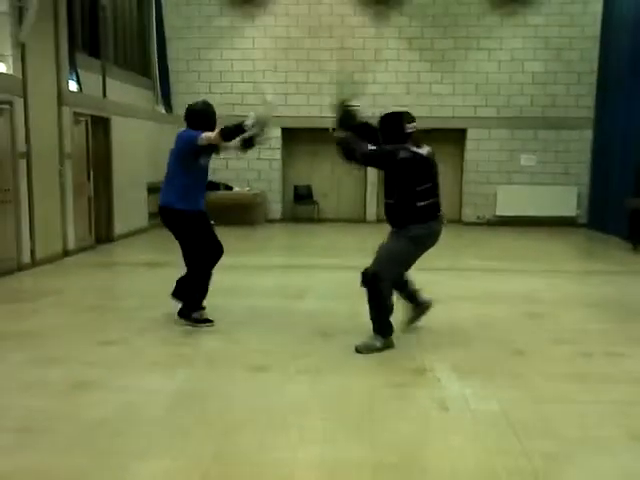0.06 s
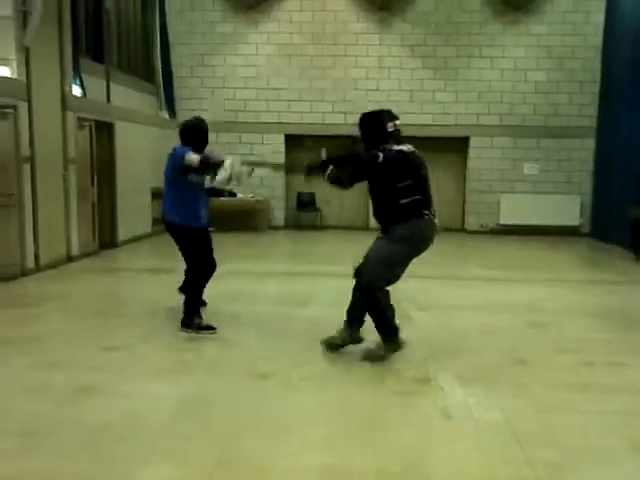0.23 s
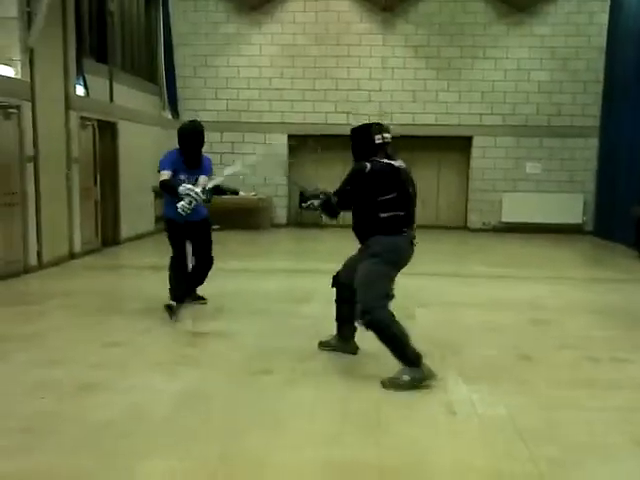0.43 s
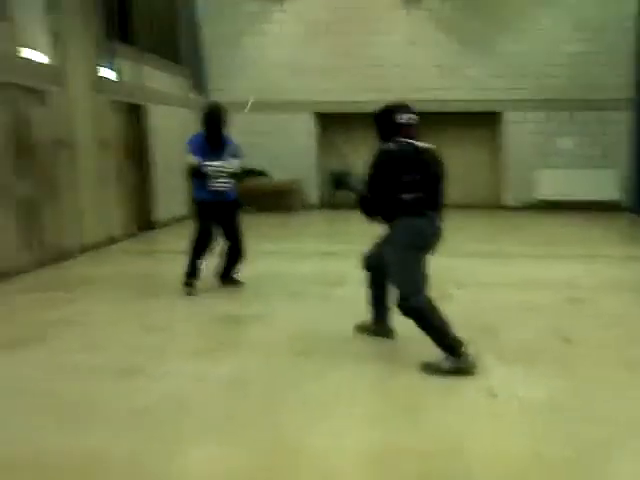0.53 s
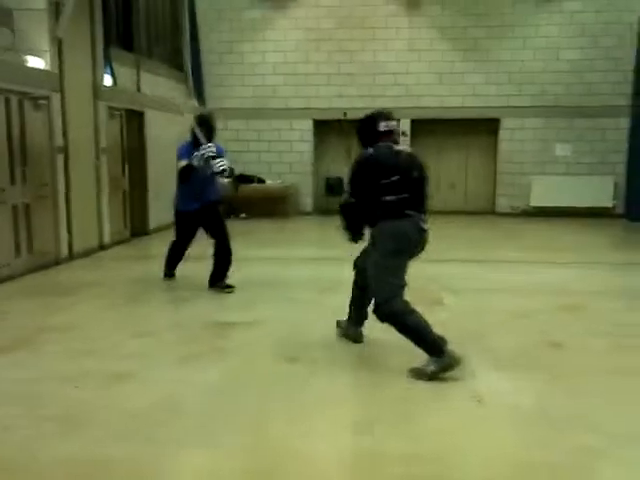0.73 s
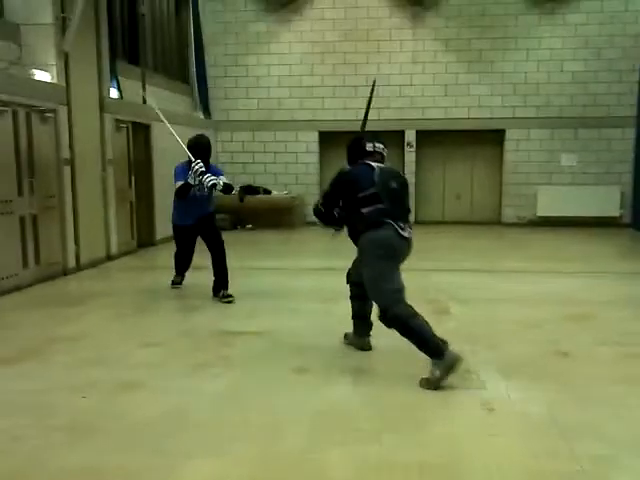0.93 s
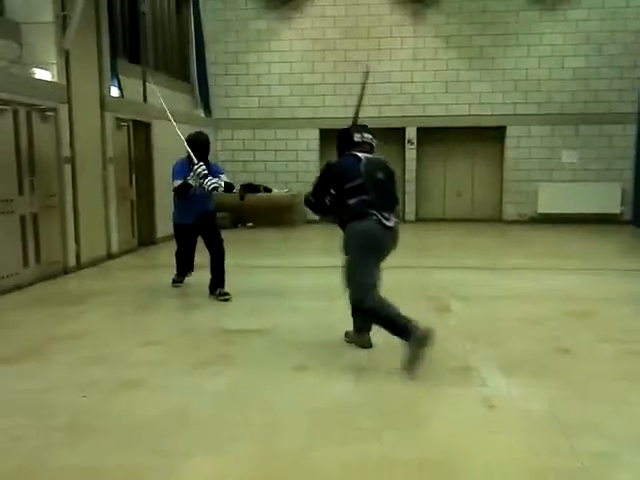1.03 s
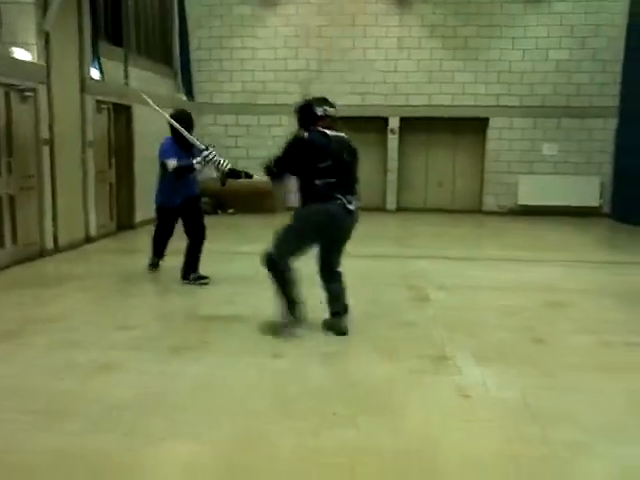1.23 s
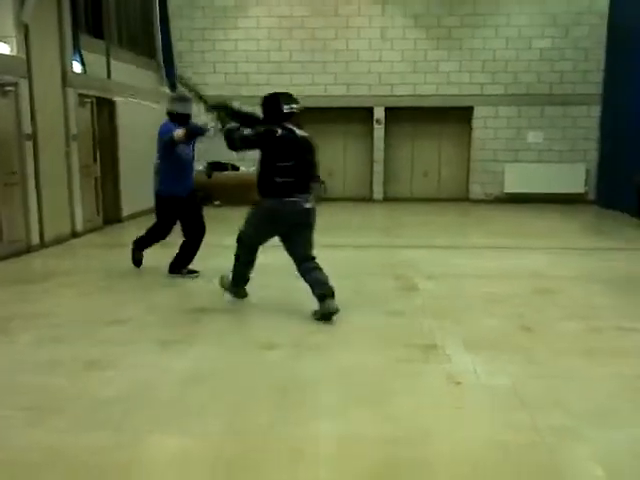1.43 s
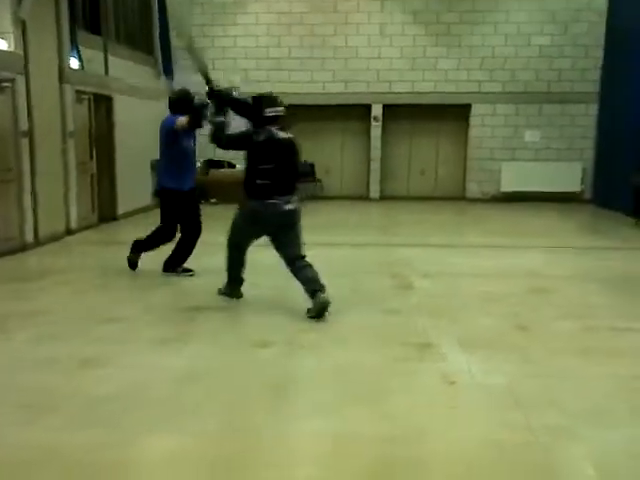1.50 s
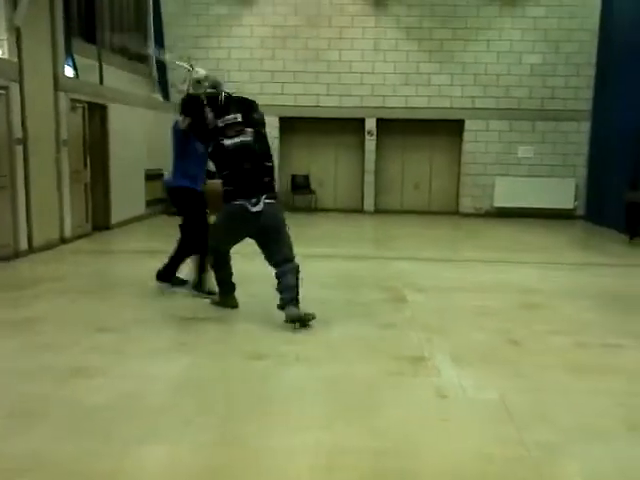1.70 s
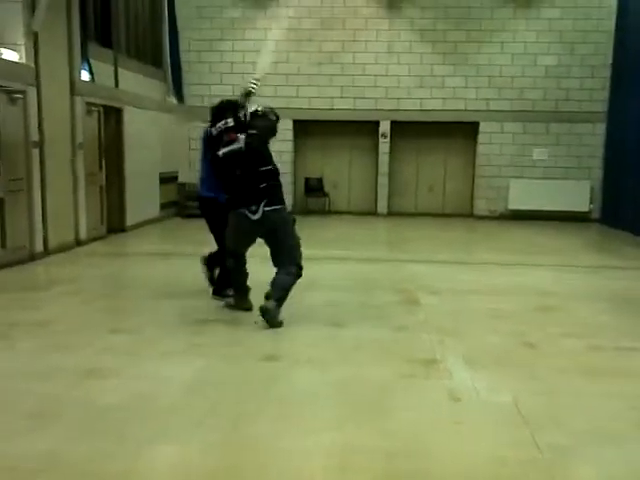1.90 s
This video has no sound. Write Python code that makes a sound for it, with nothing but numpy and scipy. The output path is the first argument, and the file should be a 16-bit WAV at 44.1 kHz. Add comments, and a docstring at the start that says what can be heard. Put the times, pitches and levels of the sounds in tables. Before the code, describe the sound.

A sharp crack of practice swords rings away in a big hall, heard from a distance. Shoes scuff softly on the hard floor, two close clicks tick at the microphone, and the blades clatter lightly near the end.

```python
"""A blow dies away under a scuffing shoe, then one hard crack of practice swords slaps back from the
walls of a large brick sports hall and rings away. Two fencers step and slide, and lighter contacts of
blades and guards clatter as they close in. The small camera microphone stands off from them, in the
hall's echo, and the crack overloads it. Dry clicks sound right at its body; mains hum lies below."""
import sys
import numpy as np
from scipy import signal
from scipy.fft import rfft, irfft, next_fast_len
from scipy.io import wavfile
from scipy.ndimage import uniform_filter1d, minimum_filter1d, map_coordinates

SR = 44100
rng = np.random.default_rng(int(sys.argv[2]) if len(sys.argv) > 2 else 0)


def dump_mix(stems):
    """Bounce the given channels to the path in sys.argv[1] as a 16-bit WAV at rate SR."""
    frames = np.atleast_2d(stems).T  # one column per channel
    limited = np.clip(frames, -1, 1)  # hard clip at full scale
    pcm = np.round(limited * 32767).astype(np.int16)
    wavfile.write(sys.argv[1], SR, pcm)


N = 85995
LEAD = SR // 2  # samples before the start, for sounds that are still ringing
T = (np.arange(N + LEAD) - LEAD) / SR
FFT_SIZE = 2 * next_fast_len(len(T))
HZ = np.fft.rfftfreq(FFT_SIZE, 1 / SR)
MIC_TOP_HZ = 7250


def blade_blows(t60_s=.009, resonance_width_hz=28, tilt_db_per_octave=-0.73, hall_db=-1.81):
    """Each crack arrives along several paths and fills the hall, coloured by the blades' resonances."""
    # hard blows: start_s, level_db
    blows = [(-.2, -20), (0.2219, -11.5)]
    # paths to the microphone, direct and off floor and walls: delay_s, gain_db
    paths = [(0, 11), (.0023, 11), (.0104, 12), (.0121, 8), (.0205, 2), (.0334, 9), (.0733, 1), (.198, -7)]
    # spectrum of a crack: frequency_hz, gain_db
    spectrum = [(40, -60), (100, -29.5), (170, -22.5), (270, -20.5), (400, -21.5), (560, -23.5), (800, -14),
                (1100, -14.5), (1650, -7), (2350, -7), (2800, -5), (3150, -6), (3600, 0), (4350, -1.5),
                (5000, -7.5), (5700, -10), (6000, -14), (6500, -12.5), (7200, -20.5), (8500, -37.5)]
    # blade resonances: pitch_hz, lift_db
    resonances = [(1692, 1.5), (2804, 3), (3517, 4.5), (3666, -5.5), (3896, 2.5), (4033, 1), (4257, 3),
                  (4389, -2.5), (4861, 11), (5683, 9.5)]
    blade_db = sum(db / (1 + (2 * (HZ - hz) / resonance_width_hz) ** 2) for hz, db in resonances)
    tilt_db = tilt_db_per_octave * np.log2(HZ + 1)
    out = np.zeros(len(T))
    for start, level_db in blows:
        power = sum((amp(db) * decay(T - start - delay, t60_s)) ** 2 for delay, db in paths)
        cracks = colour(np.sqrt(power) * np.sign(noise()), spectrum, blade_db + tilt_db)
        tail = colour(delayed(hall_tail(), start - T[0]), spectrum, blade_db)
        out += amp(level_db) * (cracks + amp(hall_db) * tail)
    return out


def blade_taps(lift_db=11, width_octaves=.6):
    """Blades and guards touch out in the hall: short clacks, each lifted in its own register."""
    # light contacts: start_s, level_db, t60_s, register_hz
    contacts = [(0.19, -30, 0.0092, 2500), (0.199, -27, 0.0063, 3760), (0.59, -37, 0.0056, 4200),
                (0.9053, -41.5, 0.035, 1900), (1.5627, -32.5, 0.006, 1000), (1.75, -38, 0.044, 2760),
                (1.7601, -32, 0.027, 2380), (1.77, -38, 0.044, 3600), (1.8032, -46, 0.011, 4400),
                (1.8051, -28, 0.017, 1840), (1.812, -29, 0.013, 4300), (1.821, -29, 0.005, 4560),
                (1.837, -37, 0.011, 4700), (1.843, -28.5, 0.013, 4470), (1.858, -30.5, .025, 3600),
                (1.915, -39, 0.12, 1827)]
    # spectrum common to the clacks: frequency_hz, gain_db
    spectrum = [(100, -27), (400, -14.5), (900, -2), (1400, -9), (2200, -9), (3200, -7.5), (4500, -1),
                (5800, -11.5), (7300, -17)]
    clacks = np.zeros(len(T))
    for start, db, t60, hz in contacts:
        register_db = lift_db * np.exp(-(np.log2((HZ + 1) / hz) / width_octaves) ** 2)
        burst = amp(db) * decay(T - start, t60) * np.sign(noise())
        clacks += colour(burst, spectrum, register_db)
    return in_hall(clacks, wet_db=0.5)


def camera_clicks(thud_hz=435, thud_t60_s=0.0054):
    """Clicks at the camera body, too close for echo: a snap and a brief high ring over a small thud."""
    # clicks: start_s, ring_db, ring_hz, t60_s, thud_db, snap_db
    clicks = [(0.6139, -7, 4230, 0.0026, -21, -37.5), (1.5163, -14.5, 4460, 0.0057, -58, -43),
              (1.5177, -5.5, 4200, 0.003, -54, -19), (1.5212, -9, 3970, 0.0085, -27.5, -27)]
    # spectrum of the snap: frequency_hz, gain_db
    spectrum = [(200, -24), (900, -18), (1500, -19), (1950, 7), (2500, -24), (4500, 7), (5700, 0),
                (7300, -1)]
    rings, snap_envelope = np.zeros((2, len(T)))
    for start, ring_db, ring_hz, t60, thud_db, snap_db in clicks:
        rings += amp(ring_db) * ping(start, ring_hz, t60, rise_s=0.00023)
        rings += amp(thud_db) * ping(start, thud_hz, thud_t60_s, rise_s=0.00037)
        snap_envelope += amp(snap_db) * decay(T - start, t60)
    return rings + colour(snap_envelope * np.sign(noise()), spectrum)


def footsteps(t60_s=0.08):
    """Shoes slap dully on the hard floor, with more echo than direct sound at this distance."""
    # footfalls: start_s, level_db
    footfalls = [(-.02, -37), (.908, -47.5), (1.563, -45), (1.574, -58.5), (1.804, -40), (1.823, -44)]
    # spectrum of a shoe's slap: frequency_hz, gain_db
    spectrum = [(40, -24.5), (100, -7.5), (180, -3.5), (300, 0), (520, -6.5), (800, -2), (1500, -15.5),
                (3000, -5), (7000, -20.5)]
    force = sum(amp(db) * decay(T - start, t60_s) for start, db in footfalls)
    return in_hall(colour(force * noise(), spectrum), wet_db=6)


def shoe_scuffs(grains_per_s=400, grain_db=0.5):
    """Soles rub on the floor: faintly grainy friction that swells and fades with each slide."""
    # slides: middle_s, half_length_s, level_db
    slides = [(0.01, 0.056, -36), (0.143, 0.025, -44.5), (1.083, 0.061, -53.5), (1.406, 0.017, -98),
              (1.503, 0.022, -53.5), (1.531, 0.01, -37.5), (1.627, 0.017, -48.5), (1.686, 0.097, -44.5),
              (1.81, 0.018, -38.5)]
    # spectrum of the friction: frequency_hz, gain_db
    spectrum = [(200, -38), (1000, -13.5), (2800, -16), (3700, -6.5), (4400, 1.5), (5100, -5.5),
                (5900, -10), (7300, -27)]
    swell = sum(amp(db) * np.exp(-((T - middle) / half) ** 2) for middle, half, db in slides)
    grain = map_coordinates(noise(), [(T - T[0]) * grains_per_s])
    friction = swell * amp(grain_db * grain) * noise()
    return in_hall(colour(friction, spectrum), wet_db=-6)


def hall_tail(build_s=0.0044):
    """Diffuse echo of the brick hall: it builds up quickly, and the treble dies first."""
    # reverberation times: frequency_hz, t60_s
    decay_times = [(100, 0.77), (400, 1.43), (1000, 1.065), (2000, 0.89), (4000, 0.89), (7000, 0.71)]
    hz, t, bands = signal.stft(noise(), SR, nperseg=256)
    fading = bands * decay(t, curve_at(decay_times, hz)[:, None])
    tail = signal.istft(fading, SR)[1][:len(T)]
    return tail * (1 - np.exp(-(T - T[0]) / build_s))


def in_hall(x, wet_db):
    """A sound together with the hall's answer."""
    tail = hall_tail()
    echo = signal.fftconvolve(x, tail / np.linalg.norm(tail))[:len(x)]
    return x + amp(wet_db) * echo


def room_tone(hiss_db=-55):
    """Mains hum and a soft steady hiss lie under everything."""
    # mains harmonics: pitch_hz, level_db
    harmonics = [(199.3, -65.5), (299.5, -69), (398.6, -73), (598.5, -72.5)]
    # spectrum of the hiss: frequency_hz, gain_db
    spectrum = [(25, -40), (60, -10), (110, 2), (200, -3), (500, -6.5), (1000, -4.5), (2500, -4.5),
                (4300, 2), (5500, -7.5), (7300, -16)]
    hum = sum(np.sqrt(2) * amp(db) * np.sin(2 * np.pi * (hz * T + rng.random())) for hz, db in harmonics)
    return hum + amp(hiss_db) * colour(noise(), spectrum)


def amp(db):
    """Decibels to gain."""
    return 10 ** (np.asarray(db) / 20)


def curve_at(points, hz):
    """(Hz, value) points read on a log frequency axis."""
    knots_hz, values = np.transpose(points)
    return np.interp(np.log(hz + 1), np.log(knots_hz + 1), values)


def noise():
    """Fresh white noise."""
    return rng.standard_normal(len(T))


def decay(t, t60):
    """Exponential decay that starts at t = 0."""
    return (t >= 0) * np.exp(-np.log(1000) * np.maximum(t, 0) / t60)


def delayed(x, delay_s):
    """The same sound, later."""
    return np.pad(x, (max(round(delay_s * SR), 0), 0))[:len(x)]


def ping(start, hz, t60, rise_s):
    """One damped resonance with a rounded start."""
    t = np.maximum(T - start, 0)
    return np.sin(2 * np.pi * hz * t) * decay(t, t60) * (1 - np.exp(-(t / rise_s) ** 2))


def colour(x, spectrum, lift_db=0):
    """Causal filter of unit power within the microphone's band."""
    gain = amp(curve_at(spectrum, HZ) + lift_db)
    gain /= np.sqrt(np.mean(gain ** 2 * (HZ < MIC_TOP_HZ)))
    # minimum phase: nothing rings ahead of a hit
    cepstrum = irfft(np.log(gain))
    cepstrum[1:FFT_SIZE // 2] *= 2
    cepstrum[FFT_SIZE // 2 + 1:] = 0
    return irfft(rfft(x, FFT_SIZE) * np.exp(rfft(cepstrum)))[:len(x)]


def low_pass(x, edge_hz, order=70):
    """Steep treble cut."""
    return irfft(rfft(x, FFT_SIZE) / np.sqrt(1 + (HZ / edge_hz) ** (2 * order)))[..., :N]


def limiter(x, ceiling=.88, window_samples=41):
    """Fast gain reduction that holds the loudest peaks down."""
    gain = ceiling / np.maximum(np.abs(x), ceiling)
    return x * uniform_filter1d(minimum_filter1d(gain, window_samples), window_samples)


def scene():
    """Everything that reaches the microphone, in mono."""
    fencers = blade_blows() + blade_taps() + footsteps() + shoe_scuffs()
    return (fencers + camera_clicks() + room_tone())[None, LEAD:]


def record(dry, low_cut_hz=130, ceiling=.75, hardness=10):
    """A small narrow-band microphone whose loudest peaks are limited and just saturate."""
    x = signal.sosfilt(signal.butter(2, low_cut_hz, "highpass", fs=SR, output="sos"), dry)
    x = limiter(low_pass(x, MIC_TOP_HZ))
    saturated = x / (1 + np.abs(x / ceiling) ** hardness) ** (1 / hardness)
    return low_pass(saturated, edge_hz=16200)


dry = scene()
out = record(dry)
dump_mix(out)
```